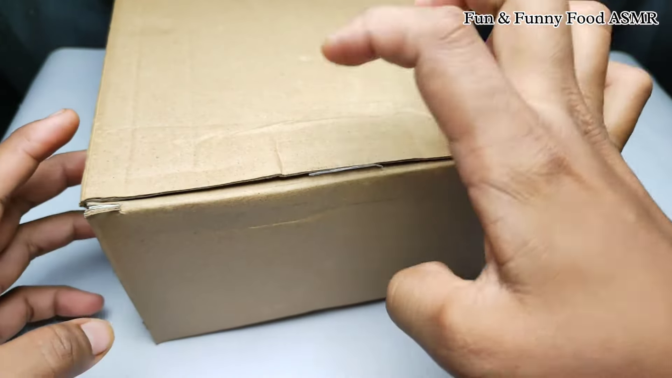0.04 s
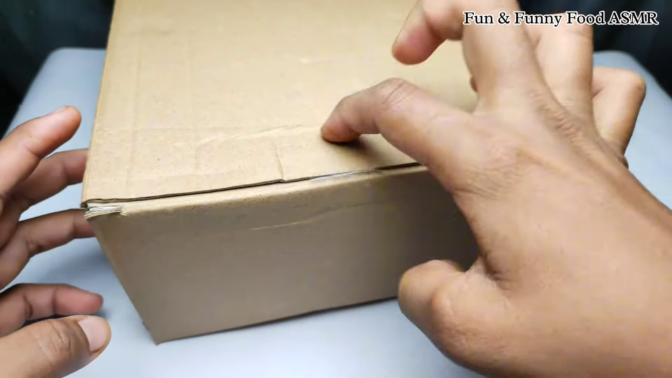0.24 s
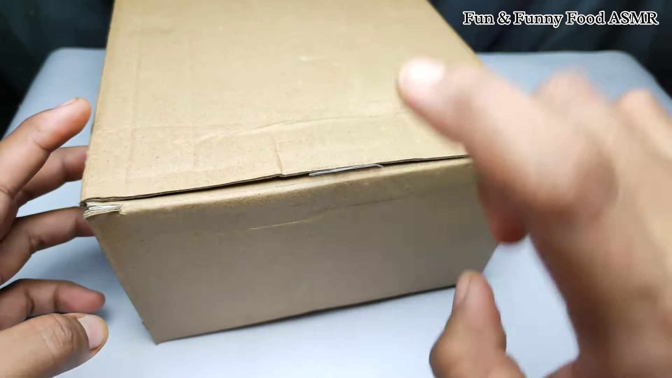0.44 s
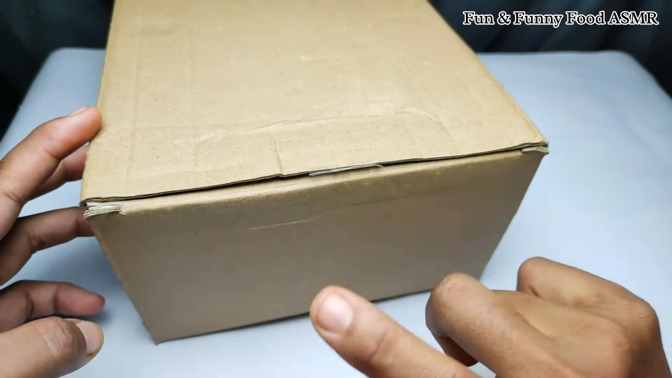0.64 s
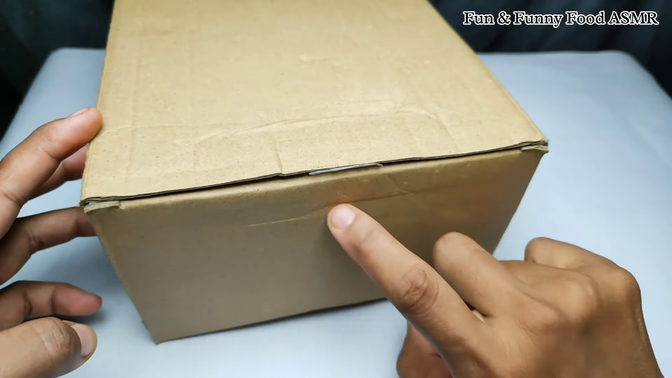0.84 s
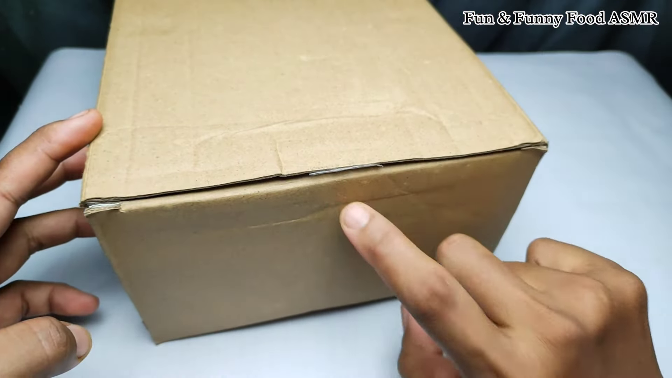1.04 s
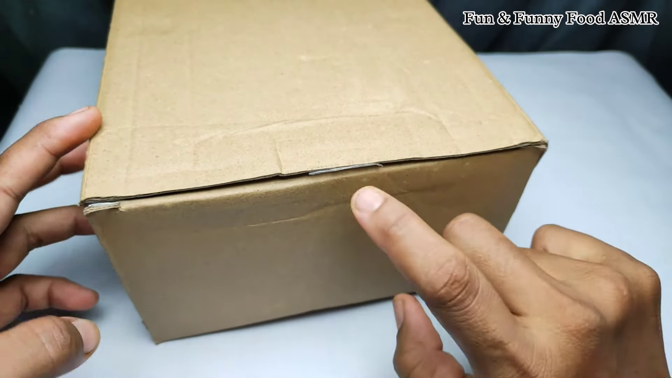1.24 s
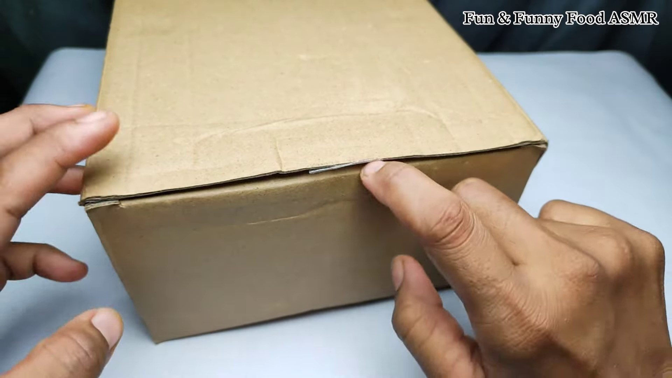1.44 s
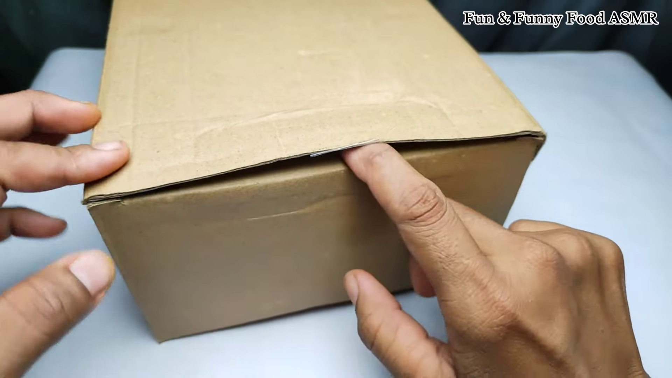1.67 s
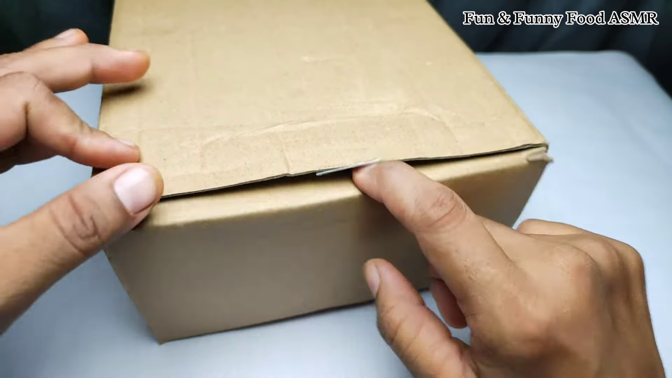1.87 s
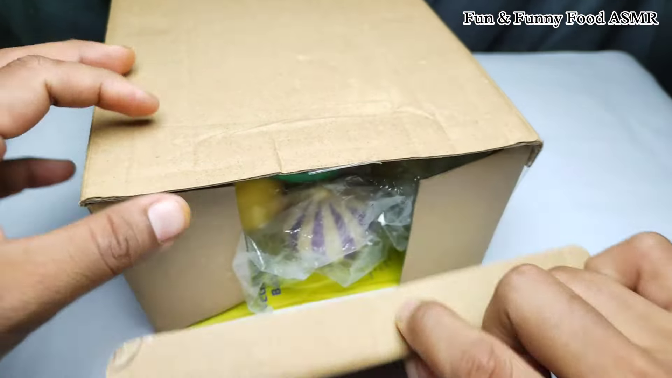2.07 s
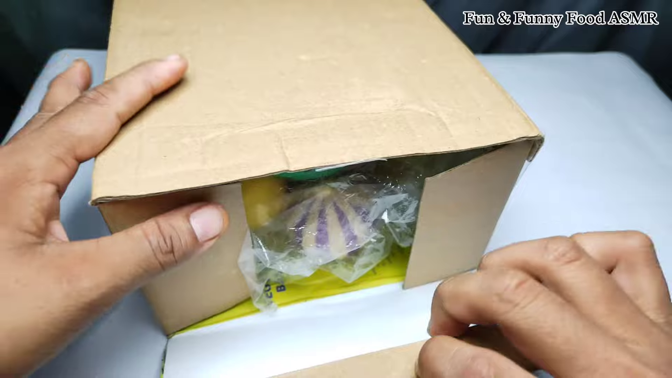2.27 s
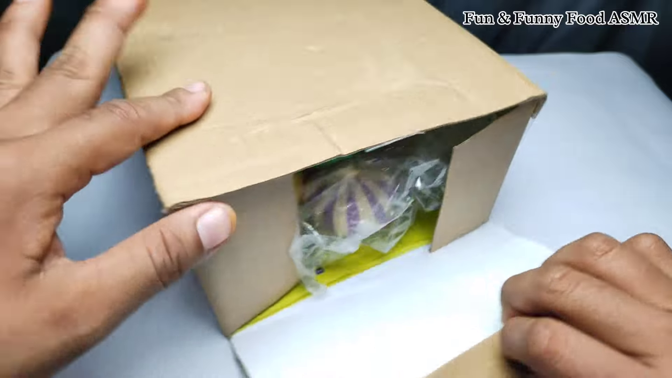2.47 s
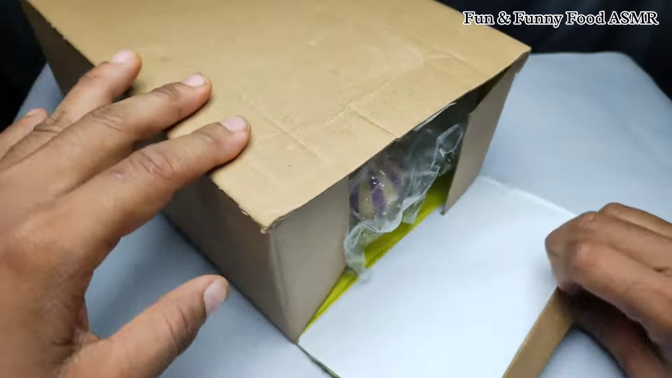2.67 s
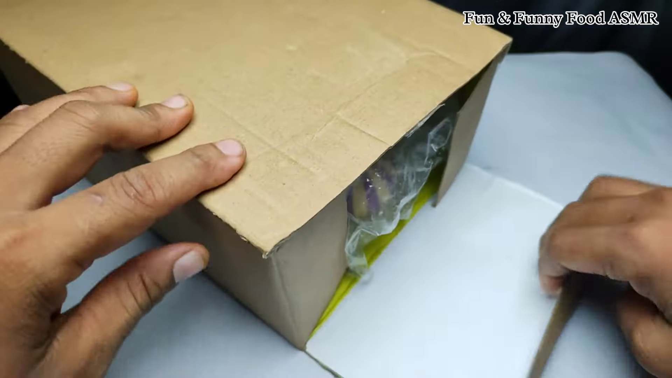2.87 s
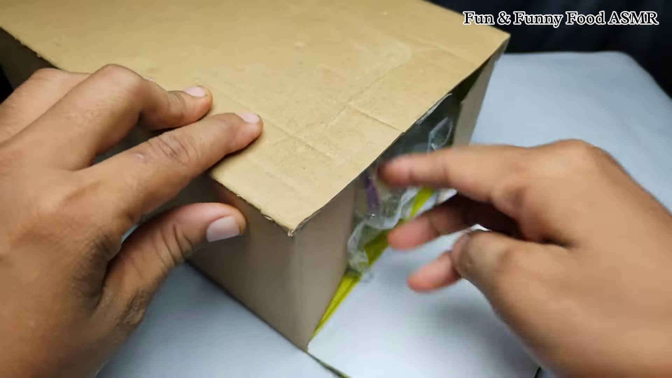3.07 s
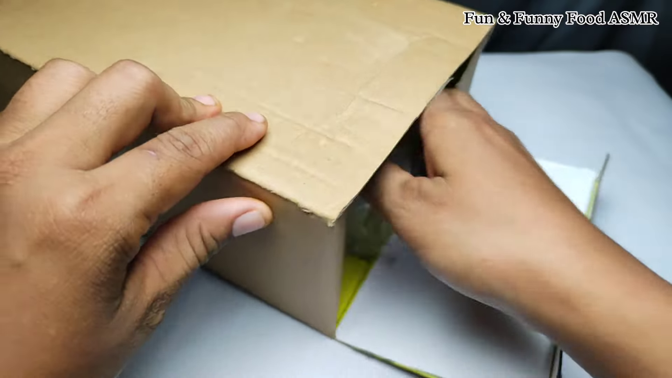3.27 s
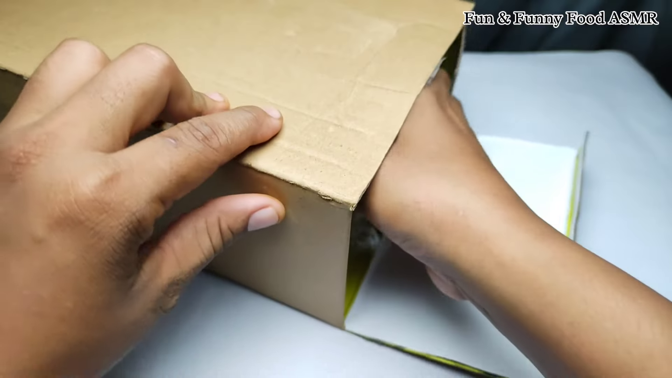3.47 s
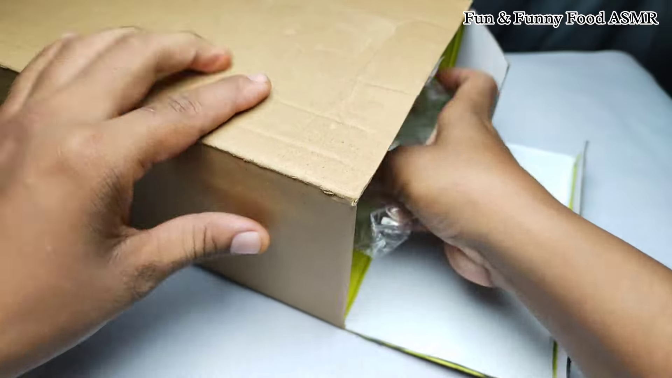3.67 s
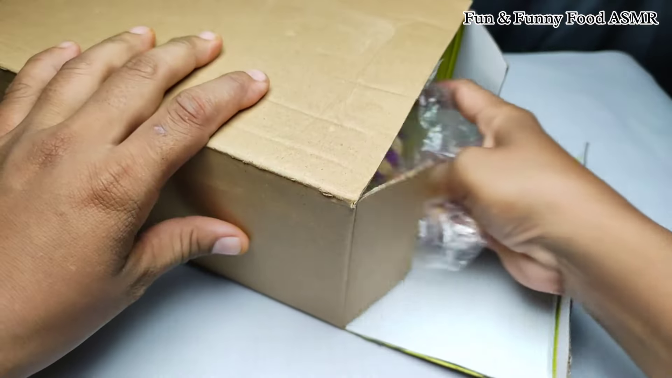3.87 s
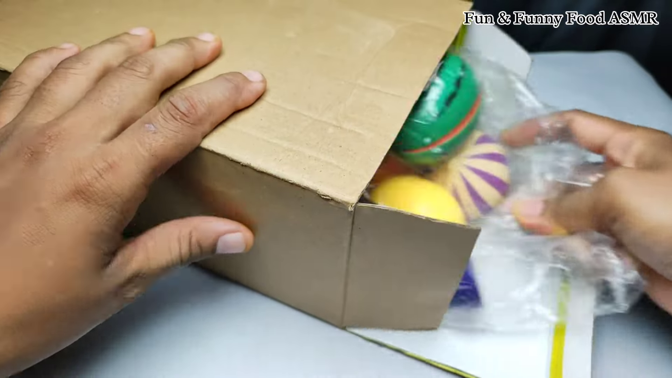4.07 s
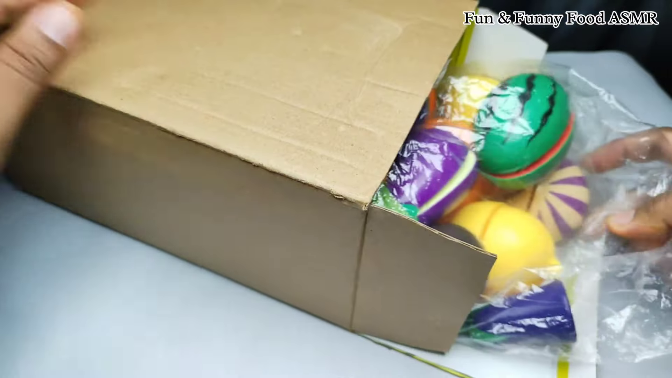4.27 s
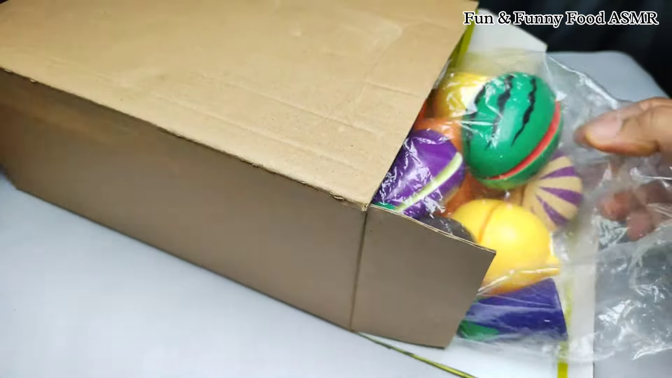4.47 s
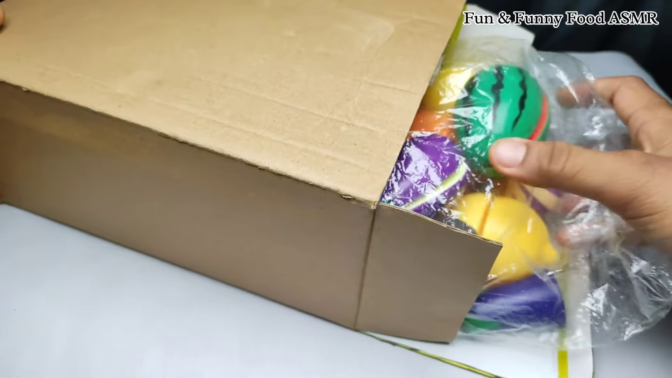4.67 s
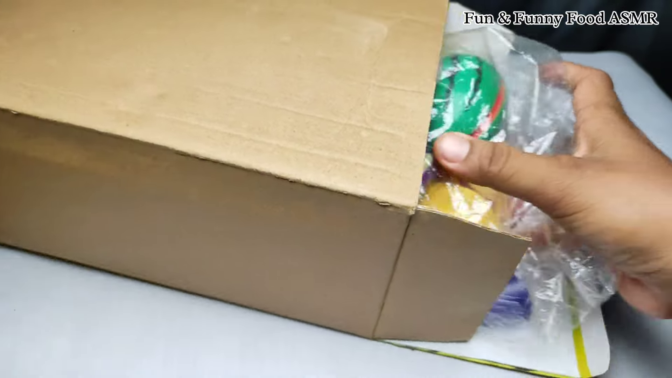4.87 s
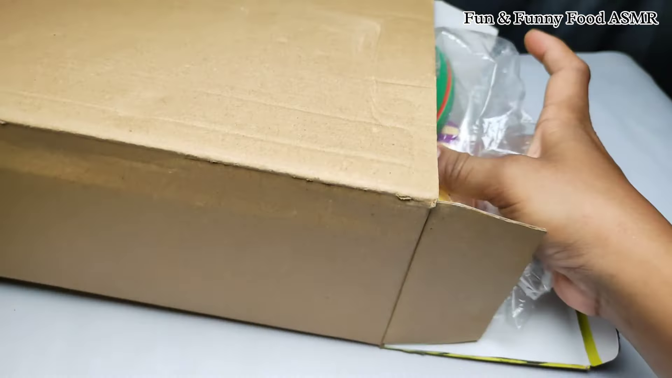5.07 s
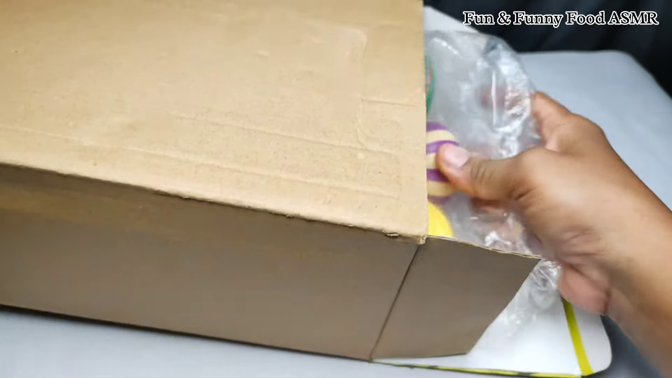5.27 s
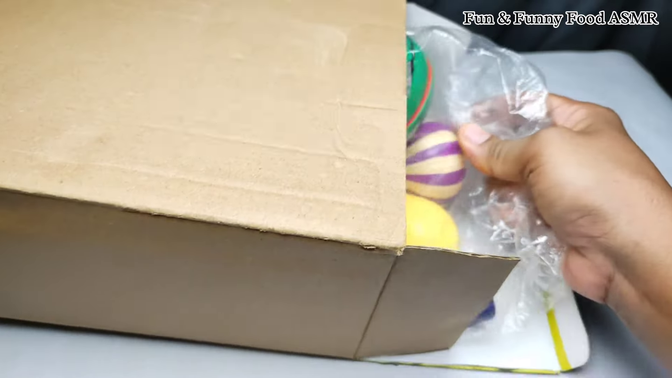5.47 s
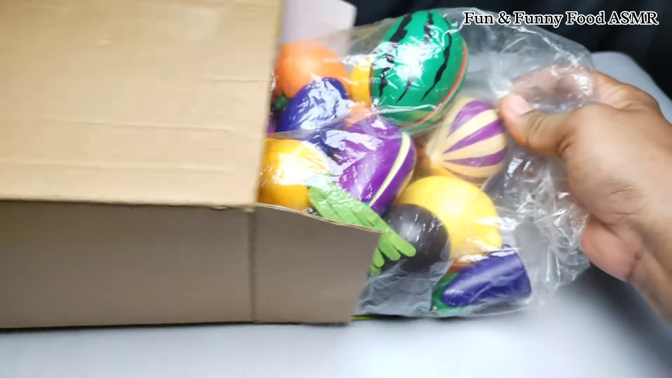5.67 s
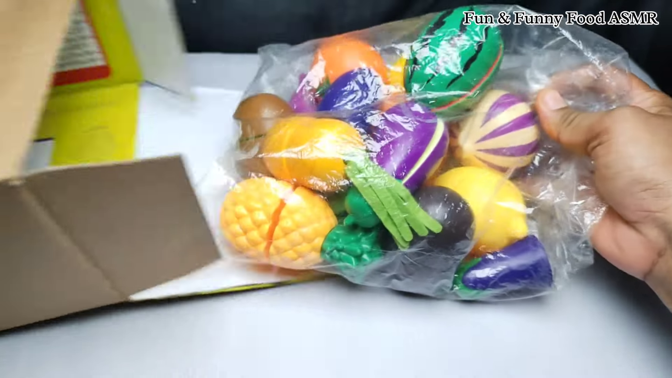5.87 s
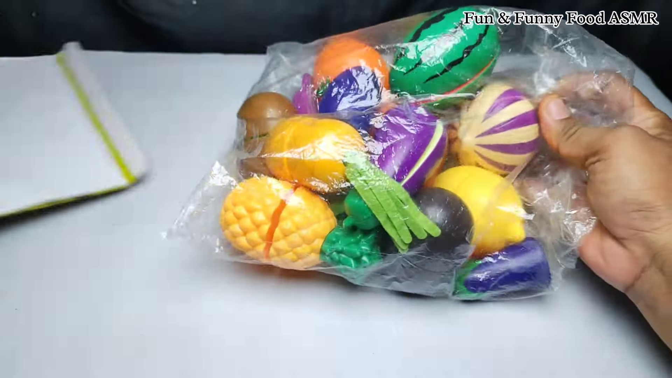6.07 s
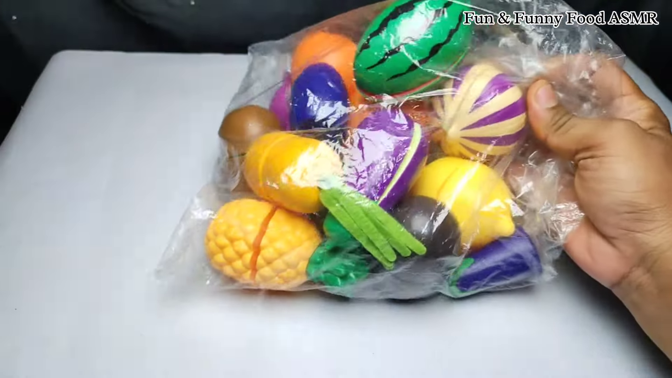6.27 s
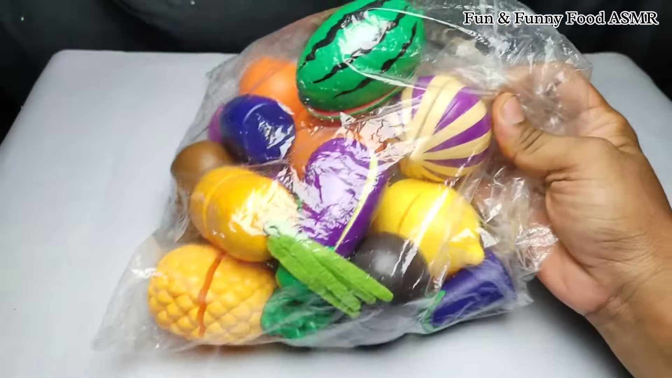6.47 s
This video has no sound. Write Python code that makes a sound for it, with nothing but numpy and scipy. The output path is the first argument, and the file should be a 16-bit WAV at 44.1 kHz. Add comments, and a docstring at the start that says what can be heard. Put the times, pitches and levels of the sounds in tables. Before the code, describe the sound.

Close up in a small quiet room, fingertips tap a hollow cardboard box, first on top with a papery slap, then softly on the side. The flap is picked at, pulled free with a sharp scrape and pop, and the box groans briefly as it turns on the table. A hand then grabs a plastic bag, and dense bright crinkling with toy clacks continues to the end.

```python
"""Dull finger taps on a cardboard box come first, then scrapes and a sharp pop as its flap is pried free,
a short groan as the box turns on the table, and the bright crinkle of a plastic bag of hollow toys.
An arm's length away in a small room, heard through two microphone ports. Taps ring panel modes; card and
film are dense random snaps shaped by hand movements; toys clack as decaying tones; noise makes the room."""
import sys
import numpy as np
from scipy import signal
from scipy.fft import rfft, irfft, next_fast_len
from scipy.io import wavfile
from scipy.ndimage import uniform_filter1d

SR = 44100
rng = np.random.default_rng(int(sys.argv[2]) if len(sys.argv) > 2 else 0)


def store_pcm(level_fs):
    """Save levels as 16-bit WAV."""
    pcm = np.round(np.clip(level_fs, -1, 1) * 32767).astype(np.int16)
    wavfile.write(sys.argv[1], SR, np.atleast_2d(pcm).T)


N = 287973

# All levels are relative settings within their own layer.
# single blows on box and table: [t/s, thump level/dB, papery slap level/dB, pitch ratio]
BLOWS = [(0.011, -5, -18, 0.97), (0.214, -11, -30, 1.01), (0.327, -7, -27.5, 1), (1.475, -38.5, -49.5, 1.2),
         (2.052, -11, -23, 1.04), (2.485, -24.5, -40, 1.34), (4.709, -16.5, -31, 1.27),
         (5.725, -19, -34, 1.12), (5.783, -16, -25, 1), (6.005, -10, -19, 1.85), (6.383, -8.5, -16, 1.16),
         (6.441, -18, -27, 1.05)]
# double taps on the side, pad then nail: [t/s, pad thump level/dB, pitch ratio, nail lag/s, nail thump level/dB]
SIDE_TAPS = [(0.9404, -7.5, 0.85, 0.01, -14), (1.1262, -2.5, 0.804, 0.008, -7), (1.263, -2, 1, 0.0058, -44)]
# panels and enclosed air of the box: [f/Hz, level/dB, t60/s]
BOX_MODES = [(103, -1.5, 0.056), (171, 1.5, 0.056), (206.5, -2, 0.034), (267.4, -9.5, 0.09),
             (330, -15, 0.16), (387, -8, 0.059), (463.6, -13, 0.15), (539.5, -11.5, 0.08),
             (726, -2.5, 0.029), (788, -8.5, 0.11), (881, -10, 0.1)]
# spectrum of the papery slap: [f/Hz, level/dB]
SLAP_SPECTRUM = [(150, -16), (350, 6.5), (900, 7), (1600, 0), (3200, -5), (5000, -16.5), (9500, -14),
                 (12500, -24), (15500, -16)]
# loose flaps after the slap, against the slap: [f/Hz, level/dB]
FLUTTER_SPECTRUM = [(2000, -13), (12000, -23.5)]
# strokes of finger and card: slide off a tap, pick at the flap, pull it, drag it free, fold it down, take hold,
# turn the box, let go: [t of fastest moment/s, rise/s, fall/s, scrape level/dB, panel hum level/dB, rasp f/Hz]
STROKES = [(.988, 0.04, 0.036, -41, -37, 2500), (1.645, 0.086, 0.21, -38.5, -37.5, 1690),
           (2.007, 0.064, 0.05, -15.5, -19.5, 3000), (2.05, 0.036, 0.021, -15.5, -35, 3000),
           (2.185, 0.17, 0.056, -26.5, -39, 3000), (2.384, 0.058, 0.32, -35.5, -41.5, 2270),
           (2.635, 0.23, 0.23, -16.5, -32, 2180), (2.95, 0.35, 0.13, -27.5, -46, 3530)]
# spectrum of scraped card: [f/Hz, level/dB]
CARD_SPECTRUM = [(150, -13.5), (300, -28), (500, -14), (880, -5.5), (1120, -18.5), (1700, -14.5),
                 (4100, -15), (5200, -26.5), (9500, -3.5), (15500, -4)]
# shoves that drag box and toys along: [t of fastest moment/s, rise/s, fall/s, rumble level/dB]
SHOVES = [(1.745, 0.094, 0.11, -41), (2.65, 0.36, 0.38, -33.5), (3.22, 0.052, 0.59, -35.5),
          (3.79, 0.32, 0.7, -33), (4.352, 0.27, 0.24, -37), (5.03, 0.36, 0.47, -35),
          (5.78, 0.14, 0.3, -25.5), (5.95, 0.16, 0.17, -27), (6.46, 0.19, 0.23, -28)]
# spectrum of the dragging: [f/Hz, level/dB]
RUMBLE_SPECTRUM = [(35, 1), (130, 3), (200, -0.5), (275, 3), (340, -20.5), (450, -3), (700, -28)]
# loudest snaps of card, film and toys: [t/s, middle-band peak level/dB, treble level/dB]
SNAPS = [(1.826, -40, -3), (2.054, -3, -13), (2.259, -22, -24), (2.297, -12, -22), (2.301, -14, -24),
         (2.924, -10, -14), (3.014, -20, -10), (3.155, -32, -20), (3.197, -6, -13), (3.215, -5, 1),
         (3.308, -6, 0), (3.469, -8, -1), (3.482, -8, 0), (3.594, -1, -14), (3.983, -2, -8),
         (4.101, -4, -2), (4.221, 0, -18), (4.244, -1, -9), (4.416, -8, 1), (4.675, -4, -5),
         (4.698, -5, -6), (4.716, -4, -7), (4.847, -1, -12), (4.953, -2, -8), (5.076, -2, -6),
         (5.335, 0, -8), (5.525, -5, -7), (5.597, 0, -11), (5.642, 1, -12), (5.802, -3, -14),
         (6.015, -4, -9), (6.14, 0, -14), (6.243, 0, -14), (6.353, -6, -6), (6.365, -3, -8),
         (6.499, -8, -4)]
# spectrum of plastic film: [f/Hz, level/dB]
FILM_SPECTRUM = [(150, -15), (300, -10.5), (640, -9), (840, -4.5), (1120, -9), (1800, 0.5), (3000, 5),
                 (4100, 2), (5200, -10), (8100, -8.5), (15500, -14)]
# the box judders on the table as it is turned: [t/s, slip rate f/Hz, level/dB]
JUDDER = [(2.5, 260, -42), (2.58, 280, -30), (2.665, 332, -27), (2.76, 270, -40)]
# tugs at the bag: [t/s, crinkle level/dB, rise/s]
TUGS = [(3.235, -18.5, 0.061), (3.599, -15, 0.042), (3.712, -12.5, 0.079), (3.86, -17, 1),
        (4.482, -15.5, 0.054), (4.591, -12.5, 0.062), (4.78, -19, 0.11), (4.92, -14.5, 0.37),
        (5.263, -13, 0.045), (5.48, -16.5, 1), (5.715, -14.5, 0.055), (5.83, -15.5, 0.075),
        (5.959, -13.5, 0.11), (6.28, -19, 0.17)]
# the fingers change grip and the film rests for a moment: [t/s, half length/s]
REGRIPS = [(3.371, 0.026), (3.498, 0.049), (4.273, 0.018), (4.638, 0.012), (4.827, 0.015), (6.425, 0.018)]
# hollow toys clack together inside the bag: [t/s, level/dB]
CLACKS = [(3.202, -13), (3.408, -11.5), (3.436, -10.5), (6.362, -12.5)]
# shell of a toy: [f/Hz, level/dB, t60/s]
SHELL_MODES = [(863, 4, 0.02), (920, -20, 0.018), (1770, -3, 0.02)]
# spectrum of the room tone: [f/Hz, level/dB]
FLOOR_SPECTRUM = [(25, 3), (59, 2), (206, -15.5), (790, -26), (1070, -28.5), (3920, -37), (7300, -57)]
# decay of the room: [f/Hz, t60/s]
ROOM_DECAY = [(100, 0.17), (350, 0.15), (900, 0.05), (3000, 0.11), (8000, 0.081), (15000, 0.0055)]
# colour of the microphone ports: [f/Hz, width/Hz, level/dB]
PORTS = [(890, 130, 2.5), (1103, 170, -4), (3990, 220, 2), (6136, 480, 9.5), (6610, 1010, -3.5),
         (12240, 480, -10)]

CONTACT_S, SLAP_LAG_S = 0.0017, 0.00202  # a single blow bends the panel first; the flaps slap just after
PAD_CONTACT_S, PAD_SLAP_DB = 0.0047, -25.5  # both slaps are relative to the pad's thump
NAIL_CONTACT_S, NAIL_SLAP_DB, NAIL_RATIO = 0.0039, -18.5, 1.1
MODE_DRIFT = 0.025  # the holding hand retunes the upper modes by about this share from blow to blow
STROKE_DROP_DB, STROKE_SHAPE = 18, 1.19  # loss after one rise or fall time; 1 = pointed, 2 = rounded
RASP_DB, RASP_OCTAVES = 5.5, 0.78  # height and width of the rasp's resonance
SNAP_LIFE_S, SNAP_BODY_DB = 0.011, -7.5
SNAP_RING_HZ, SNAP_RING_DB = 2700, 3
GRAB_S, ONSET_S = 3.2, 0.0097  # the hand meets the bag
HOLD_DB, TUG_FALL = -19, 0.65  # crinkle while the bag is held; fall time of a tug over its rise time
REST_S, SETTLE_DB_PER_S = 6.37, 16  # the bag comes to rest and the steady hold quietens
OUT_S, EMERGE_S = 3.77, 1  # the bag leaves the box around this time, over this long
RUSTLE_IN_DB, RUSTLE_OUT_DB = -2.5, -6  # toy rustle against the crinkle, inside and outside the box
FINE_DB, FRESH_DB, FRESH_S = -10.5, 5, 0.58  # fine crackle; surplus at the first grab and its decay time
FOLDS_PER_S, FOLD_DB = 55, -7.5  # larger folds that crack singly, level against the small creases
REGRIP_DB = -6  # depth of the lull while the fingers change grip
SLACK_DB, SLACK_AFTER_S, SLACK_S = -7, 0.008, 0.007  # slack film after a snap: depth, delay, half length
TOP_HZ = 16100


def amp(db):
    """Decibels to gain."""
    return 10 ** (np.asarray(db) / 20)


def lean_left(db):
    """Gains of the two ports: the left raised and the right lowered by db."""
    return amp([[db], [-db]])


def unit(x):
    """Scale to rms 1."""
    return x / np.sqrt(np.mean(x ** 2) + 1e-20)


def along(points, hz):
    """Read (Hz, value) points on a log axis."""
    f, v = np.transpose(points)
    return np.interp(np.log(hz + 1), np.log(f), v)


def bump(hz, centre, octaves):
    """A rounded resonance of height 1 on a log axis."""
    return np.exp(-(np.log2((hz + 1) / centre) / octaves) ** 2)


def coloured(x, db_of_hz):
    """Causal minimum-phase filter with the given dB response."""
    m = 2 * next_fast_len(x.shape[-1] // 2 + 2048)
    response = amp(db_of_hz(np.fft.rfftfreq(m, 1 / SR)))
    cepstrum = irfft(np.log(np.maximum(response, 1e-6)))
    # folding the cepstrum forward in time makes the filter causal
    cepstrum[1:m // 2] *= 2
    cepstrum[m // 2 + 1:] = 0
    return irfft(rfft(x, m) * np.exp(rfft(cepstrum)), m)[..., :x.shape[-1]]


def registers(x, spectrum, low_hz=1150, high_hz=5200):
    """Body, middle and treble of x in a material's colour, each of rms 1."""
    def above(hz, edge):
        return -10 * np.log10(1 + (edge / (hz + 1)) ** 10)

    def below(hz, edge):
        return -10 * np.log10(1 + (hz / edge) ** 10)

    shapes = [lambda hz: below(hz, low_hz),
              lambda hz: above(hz, low_hz) + below(hz, high_hz),
              lambda hz: above(hz, high_hz)]
    return [unit(coloured(x, lambda hz: along(spectrum, hz) + shape(hz))) for shape in shapes]


def add(track, s, sound):
    """Mix a sound into a stereo track at time s."""
    part = track[:, max(round(s * SR), 0):][:, :sound.shape[-1]]
    part += sound[..., :part.shape[1]]


def swell(s, rise, fall):
    """Gain of one hand movement that speeds up until time s and slows down again."""
    t = np.arange(N) / SR - s
    away = np.maximum(-t / rise, t / fall)
    return amp(-STROKE_DROP_DB * np.abs(away) ** STROKE_SHAPE)


def together(gains_of_moves):
    """Overlapping movements add in power."""
    return np.sqrt(np.sum(np.square(gains_of_moves), axis=0))


def crackles(rate, scatter_db, life, ring, ring_hz, spread, size=160):
    """Tiny random snaps, each with its own size, pitch and place; their running level is even."""
    n = int(rate * N / SR)
    start, t = rng.uniform(0, N, n), np.arange(size) / SR
    strength, length, pitch, place, side = rng.standard_normal((5, n, 1))
    decay = np.exp(-t / (life * np.exp(length / 2)))
    facet_hz = np.minimum(ring_hz * np.exp(pitch / 2), SR / 2)
    facet = np.sin(2 * np.pi * facet_hz * t) * np.sqrt(decay)
    burst = rng.standard_normal((n, size)) * decay
    grain = amp(scatter_db * np.minimum(strength, 2.4)) * (burst + ring * facet)
    pair = []
    for ear in (-1, 1):  # each snap has its own small time and level difference between the ports
        first = np.abs(start[:, None] + ear * place * spread * SR / 2).astype(int)
        at = first + np.arange(size)
        heard = grain * amp(ear * 0.8 * side)
        pair.append(np.bincount(at.ravel(), heard.ravel(), N)[:N])
    power = uniform_filter1d(np.mean(np.square(pair), 0), size=3000)
    return np.array(pair) / np.sqrt(np.abs(power) + 1e-9)


def room_tone(db=-51):
    """A low steady rumble with a trace of hiss: coloured noise, with less difference in the bass."""
    mid, side = coloured(rng.standard_normal((2, N)), lambda hz: along(FLOOR_SPECTRUM, hz))
    side = coloured(side, lambda hz: along([(60, -7), (400, -5), (2000, -0.5)], hz))
    return amp(db) * unit(np.array([mid + side, mid - side]))


def contacts():
    """Every contact: (s, thump dB, slap dB, pitch ratio, contact time s, lag of the slap s)."""
    rows = [(*blow, CONTACT_S, SLAP_LAG_S) for blow in BLOWS]
    for s, db, ratio, lag, nail_db in SIDE_TAPS:
        rows.append((s, db, db + PAD_SLAP_DB, ratio, PAD_CONTACT_S, 0))
        rows.append((s + lag, nail_db, db + NAIL_SLAP_DB, NAIL_RATIO, NAIL_CONTACT_S, 0))
    return rows


def panel_ring(ratio, t):
    """Decaying panel modes; the lowest three depend on where the finger lands."""
    ring = 0
    for k, (hz, level, t60) in enumerate(BOX_MODES):
        tuning = ratio if k < 3 else 1 + MODE_DRIFT * rng.standard_normal()
        decay = amp(level + rng.normal(0, 1) - 60 * t / t60)
        ring = ring + (-1) ** k * decay * np.sin(2 * np.pi * hz * tuning * t)
    return ring


def papery_slap(t):
    """A short crack of noise with a longer flutter of the loose flaps."""
    crack, flutter = rng.standard_normal((2, 2, len(t))) * (1 - np.exp(-t / 0.00052))
    flutter = coloured(flutter * amp(-60 * t / 0.17), lambda hz: along(FLUTTER_SPECTRUM, hz))
    mid, side = crack * amp(-60 * t / 0.025) + flutter
    side = coloured(side, lambda hz: along([(300, 1.5), (2500, 0.98)], hz))
    return coloured(np.array([mid + side, mid - side]), lambda hz: along(SLAP_SPECTRUM, hz) + 10)


def taps():
    """Each blow bends the panels, which ring briefly while the loose flaps slap."""
    out, t = np.zeros((2, N)), np.arange(SR // 3) / SR
    for s, db, slap_db, ratio, contact, slap_lag in contacts():
        push = t * np.exp(-4 * t / contact)  # a soft fingertip weakens the high modes
        thump = signal.fftconvolve(panel_ring(ratio, t), push / push.sum())[:len(t)]
        add(out, s, -amp(db + 7.0) * thump)
        add(out, s + slap_lag, amp(slap_db) * papery_slap(t))
    return out * lean_left(1.6)


def cardboard(hiss_db=-24, hiss_growth=0.67):
    """Fibres catch and slip in jerks that make the panels hum; light strokes mostly hiss, firm ones rasp."""
    slips = crackles(rate=2400, scatter_db=2.0, life=0.0018, ring=0.27, ring_hz=2435, spread=0.00016)
    body, middle, treble = registers(slips, CARD_SPECTRUM)
    out = np.zeros((2, N))
    for s, rise, fall, scrape_db, hum_db, hz in STROKES:
        hum = amp(hum_db - 3) * body
        rasp = unit(coloured(middle, lambda f: RASP_DB * bump(f, hz, RASP_OCTAVES)))
        hiss = amp(hiss_db + hiss_growth * scrape_db) * treble
        out += swell(s, rise, fall) * (hum + amp(scrape_db - 8.0) * rasp + hiss)
    return out * lean_left(0.9)


def box_tick(hz=1650, db=-21, life=0.023, click_db=-7):
    """A small pitched tick, a decaying tone with a noise click, follows the first tap on the side."""
    out, t = np.zeros((2, N)), np.arange(SR // 10) / SR
    ring = np.sin(2 * np.pi * hz * t) * amp(-60 * t / life) * (1 - np.exp(-2 * hz * t))
    burst = rng.standard_normal((2, len(t))) * amp(-120 * t / life)
    click = coloured(burst, lambda f: -30 * np.log10(1 + ((f - 2200) / 1300) ** 2))
    add(out, 1.0088, amp(db) * (ring + amp(click_db) * click / np.abs(click).max()))
    return out


def dragging():
    """Box and toys judder along as they slide, a low rumble nearly alike at both ports."""
    jerks = crackles(rate=240, scatter_db=3.0, life=0.0014, ring=0.51, ring_hz=436, spread=0.00027)
    push = together([amp(db) * swell(s, rise, fall) for s, rise, fall, db in SHOVES])
    rumble = unit(coloured(jerks, lambda hz: along(RUMBLE_SPECTRUM, hz)))
    return amp(4.5) * push * rumble * lean_left(1)


def snaps(level_db=-1, rise=0.001229, lag=0.000096, size=2048):
    """Larger creases and edges give way as noise that swells over two rise times, then dies away."""
    out, t = np.zeros((2, N)), np.arange(size) / SR
    give = np.minimum(t / (2 * rise), 1) ** 2 * amp(-60 * np.maximum(t - 2 * rise, 0) / SNAP_LIFE_S)
    for s, db, bright_db in SNAPS:
        shared, left, right = rng.standard_normal((3, size)) * give
        late = lag * rng.standard_normal()  # one port hears the shared part later
        shared_pair = [np.interp(t - max(ear * late, 0), t, shared, left=0) for ear in (-1, 1)]
        crack = np.array(shared_pair) + 0.5 * np.array([left, right])
        facet_hz = SNAP_RING_HZ * np.exp(0.3 * rng.standard_normal())
        crack = coloured(crack, lambda hz: SNAP_RING_DB * bump(hz, facet_hz, 0.27))
        body, middle, treble = registers(crack, FILM_SPECTRUM)
        snap = amp(SNAP_BODY_DB) * body + middle + amp(bright_db) * treble
        add(out, s - rise, amp(db + level_db) * snap / np.abs(middle).max())
    return out


def box_groan(rasp_db=5, slip_s=0.00079, fade=0.02):
    """The box bottom sticks and slips unevenly: a short hollow groan, with a gritty rasp at each slip."""
    s, hz, db = np.transpose(JUDDER)
    t = np.arange(N) / SR
    waver = 0.22 * unit(uniform_filter1d(rng.standard_normal(N), size=200))
    cycles = np.cumsum(np.interp(t, s, hz) * np.exp(waver)) / SR
    slips = np.diff(np.floor(cycles), prepend=0) * amp(2.5 * rng.standard_normal(N))
    hollow = coloured(slips, lambda f: 26 * bump(f, hz.mean(), 0.77) + along([(520, -2), (4000, -24)], f))
    sliding = signal.lfilter([1], [1, -np.exp(-1 / (slip_s * SR))], slips)
    grit = signal.butter(3, [1400, 3800], "band", fs=SR, output="sos")
    rasp = unit(signal.sosfilt(grit, sliding * rng.standard_normal((2, N))))
    gate = np.clip(np.minimum(t - s[0], s[-1] - t) / fade + 1, 0, 1)
    return gate * amp(np.interp(t, s, db)) * (unit(hollow) + amp(rasp_db) * rasp)


def handling():
    """Gains of crinkle, toy rustle and fine crackle: a hold with tugs and lulls, hollower inside the box."""
    t = np.arange(N) / SR
    held = np.clip((t - GRAB_S) / ONSET_S + 1, 0, 1)
    hold = amp(HOLD_DB - SETTLE_DB_PER_S * np.maximum(t - REST_S, 0))
    effort = together([hold] + [amp(db) * swell(s, rise, TUG_FALL * rise) for s, db, rise in TUGS])
    lull_db = REGRIP_DB * sum(np.exp(-((t - s) / half) ** 2) for s, half in REGRIPS)
    # after each snap the film is slack and quiet
    slack = np.array(SNAPS)[:, 0] + SLACK_AFTER_S
    nearest = slack[np.searchsorted((slack[1:] + slack[:-1]) / 2, t)]
    lull_db += SLACK_DB * np.exp(-((t - nearest) / SLACK_S) ** 2)
    outside = np.clip((t - OUT_S) / EMERGE_S + 0.5, 0, 1)
    rustle = amp(RUSTLE_IN_DB + (RUSTLE_OUT_DB - RUSTLE_IN_DB) * outside)
    fine = amp(FINE_DB + FRESH_DB * np.exp(-np.maximum(t - GRAB_S, 0) / FRESH_S))
    return held * effort * amp(lull_db), rustle, fine


def patches(x, depth_db, size=7, order=15):
    """Shifting folds strengthen different pitches from moment to moment."""
    z = signal.stft(x, nperseg=512)[2]
    field = uniform_filter1d(rng.standard_normal(z.shape[1:]), size, 0)  # smooth over pitch
    field = uniform_filter1d(field, order, 1)  # smooth over time
    gain = amp(depth_db * unit(field))
    return signal.istft(z * unit(gain), nperseg=512)[1][:, :N]


def bag():
    """Film creases buckle by the thousand, larger folds crack singly, and the hollow toys rustle along."""
    crinkle, rustle, fine = handling()
    creases = crackles(rate=1500, scatter_db=1.0, life=0.002, ring=0.55, ring_hz=2325, spread=0.00012)
    folds = crackles(rate=FOLDS_PER_S, scatter_db=3, life=0.0006, ring=0.8, ring_hz=2325, spread=0.00012)
    film = patches(creases + amp(FOLD_DB) * folds, depth_db=1.5)
    body, middle, treble = registers(film, FILM_SPECTRUM)
    toy_rustle = rustle * body * lean_left(1.3)
    fine_crackle = fine * treble * lean_left(-1.1)  # leans right
    return amp(-3.0) * crinkle * (toy_rustle + middle + fine_crackle)


def clacks(bounce_s=0.00504, bounce_db=-3):
    """Two toys meet, chatter once and ring briefly in their shell modes."""
    out, t = np.zeros((2, N)), np.arange(SR // 10) / SR
    for s, db in CLACKS:
        for lag, loss_db in ((0, 0), (bounce_s, bounce_db)):
            ring = 0
            for hz, level, t60 in SHELL_MODES:
                decay = amp(level + rng.normal(0, 2.0, (2, 1)) - 60 * t / t60)
                ring = ring + decay * np.sin(2 * np.pi * hz * np.exp(rng.normal(0, 0.032)) * t)
            add(out, s + lag, amp(db + loss_db) * ring)
    return out


def room(x):
    """Near walls answer a few milliseconds later; the bass of the tail is nearly alike at both ports."""
    hz, t, z = signal.stft(rng.standard_normal((2, SR // 2)), SR, nperseg=256)
    z = z * amp(-60 * t / along(ROOM_DECAY, hz)[:, None]) * (t > 0)
    alike = 0.85 * np.sinc(hz / 2600)
    z *= np.sqrt([1 + alike, 1 - alike])[:, :, None]
    mid, side = signal.istft(z, SR, nperseg=256)[1]
    tail = np.array([mid + side, mid - side])
    return signal.fftconvolve(x, tail / np.linalg.norm(tail[0]), axes=1)


def moving_room(x, size=4096):
    """The echoes change as hands and box move about: a new random tail for each block of samples."""
    out = np.zeros((2, N))
    for start in range(0, N, size):
        add(out, start / SR, room(x[:, start:start + size]))
    return out


def scene():
    """Everything happens on the table, an arm's length from the microphone."""
    knocks = taps() + box_tick()
    card = cardboard() + box_groan()
    toys = dragging() + bag() + snaps() + clacks()
    sent = amp(-14) * knocks + amp(-8) * card + amp(-6) * toys  # feeds the room
    sent = signal.sosfilt(signal.butter(2, 180, "high", fs=SR, output="sos"), sent)
    return knocks + card + toys + moving_room(sent[:1]) + room_tone()


def record(dry, low_hz=55):
    """The ports colour the sound, the highest peaks are rounded off and the band ends steeply."""
    def response(hz):
        ports = sum(db * np.exp(-((hz - centre) / width) ** 2) for centre, width, db in PORTS)
        return ports - 10 * np.log10(1 + (low_hz / (hz + 1)) ** 2)

    x = coloured(dry, response)
    x = x / (1 + np.abs(x / 0.92) ** 6) ** (1 / 6)
    # the stop band begins 700 Hz above the top
    return signal.sosfilt(signal.cheby2(14, 80, TOP_HZ + 700, fs=SR, output="sos"), x)


dry = scene()
out = record(dry)
store_pcm(out)
```